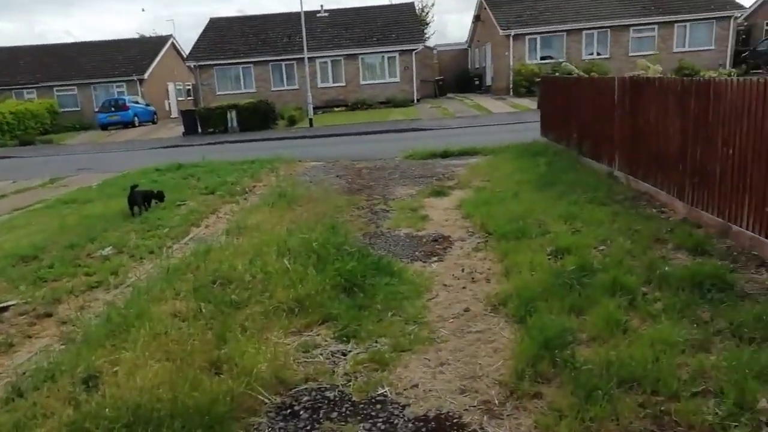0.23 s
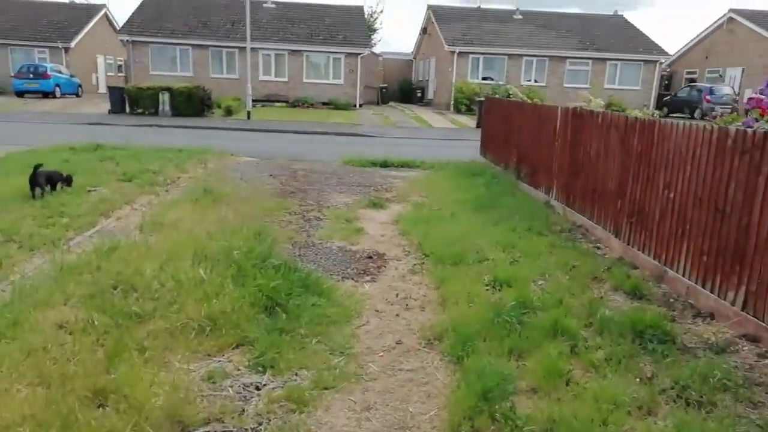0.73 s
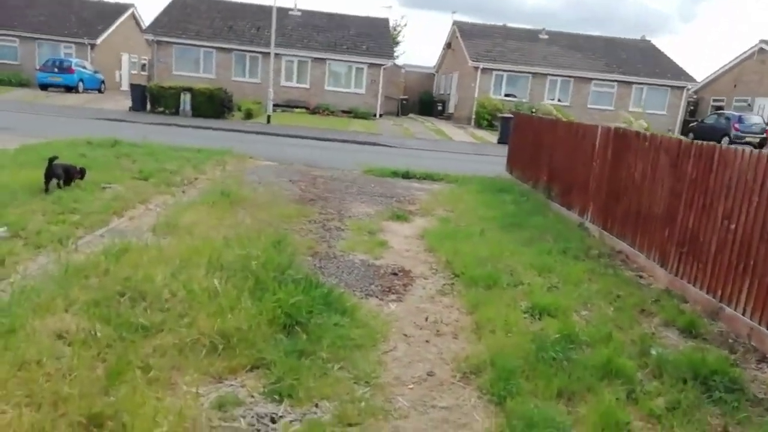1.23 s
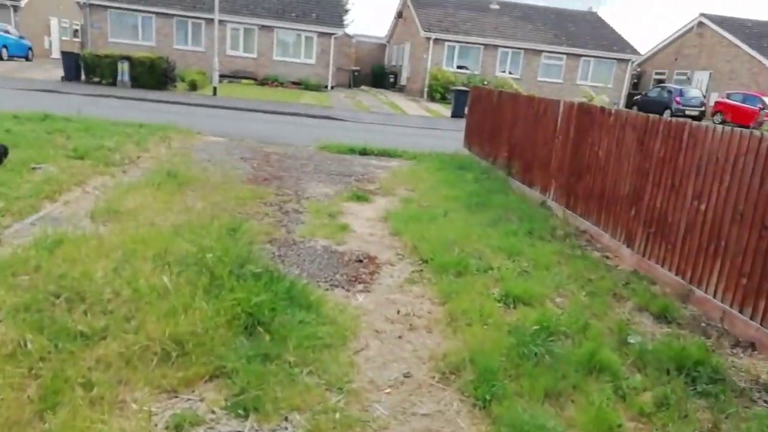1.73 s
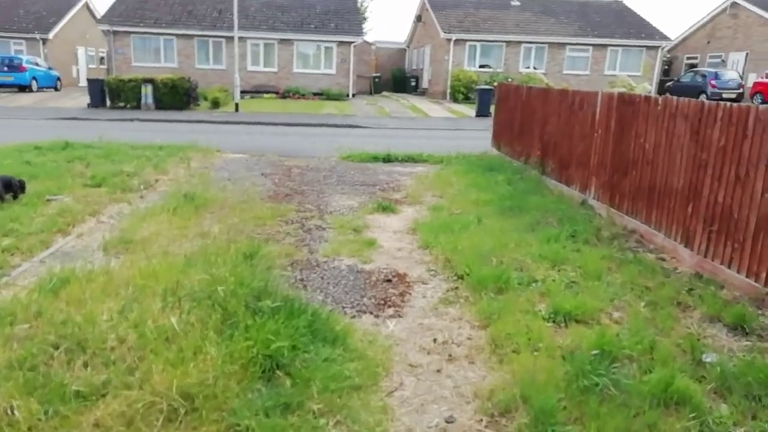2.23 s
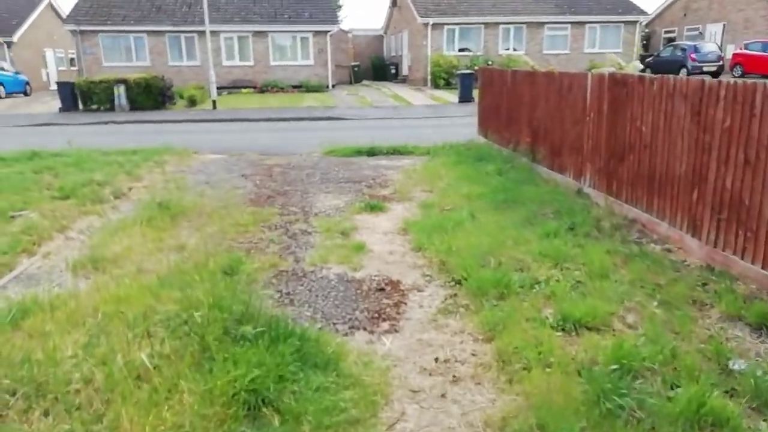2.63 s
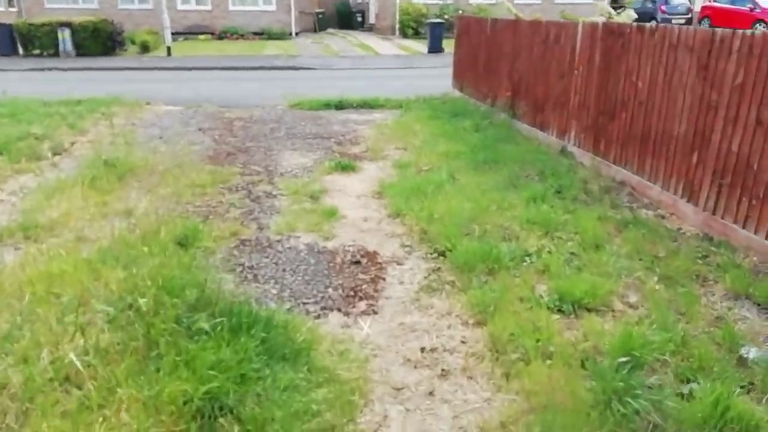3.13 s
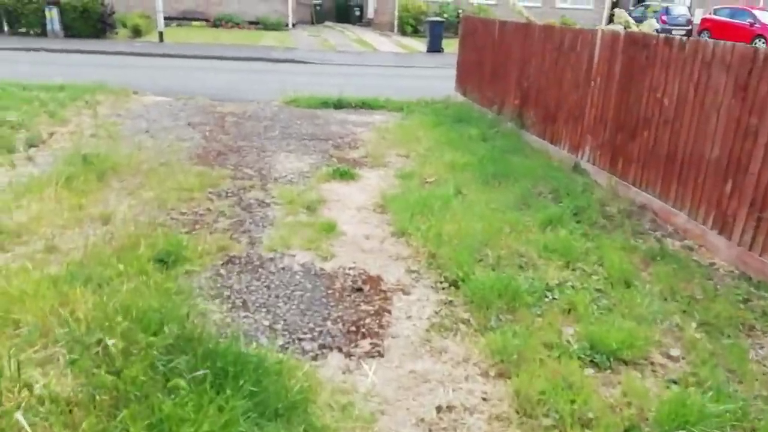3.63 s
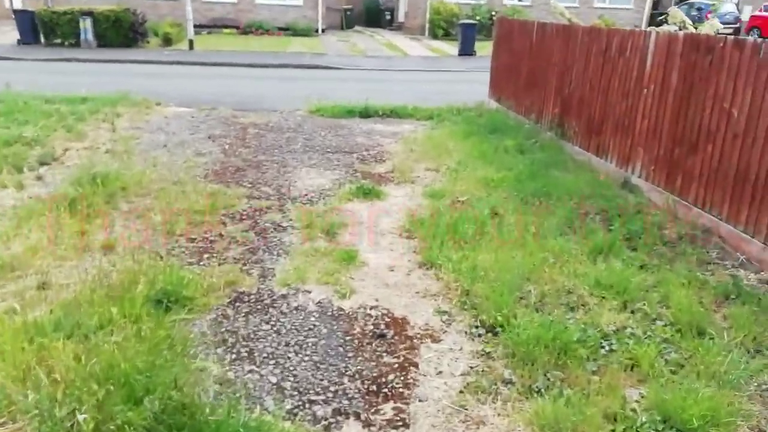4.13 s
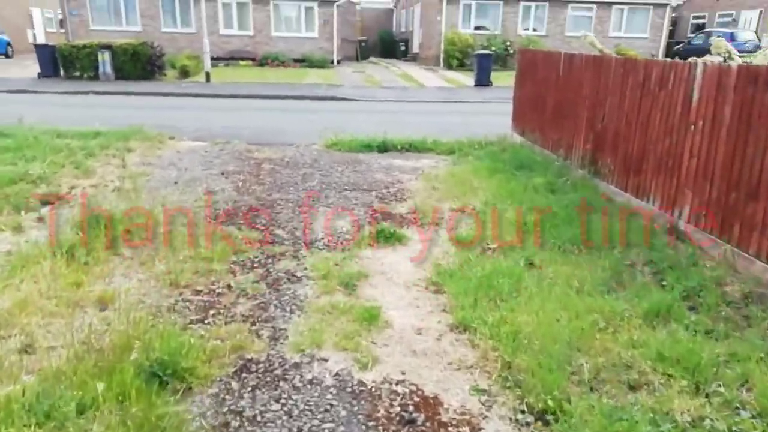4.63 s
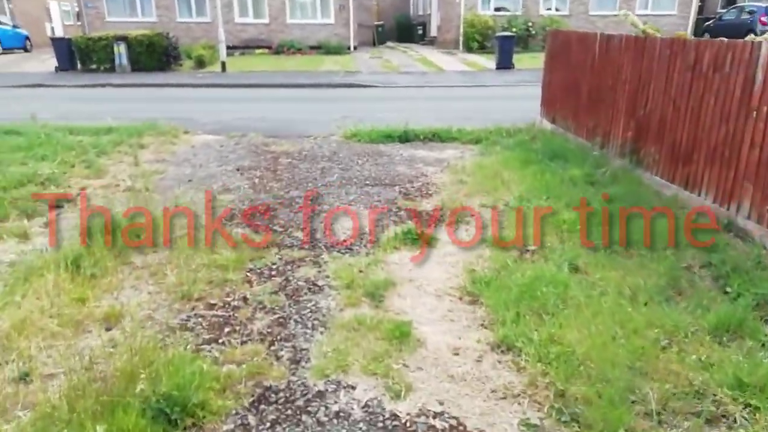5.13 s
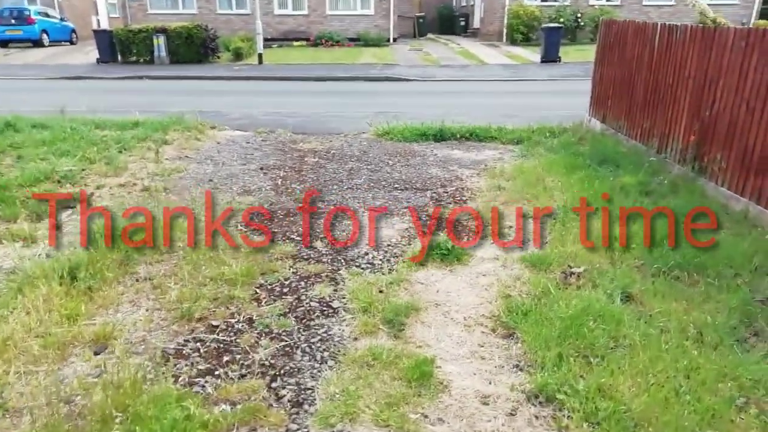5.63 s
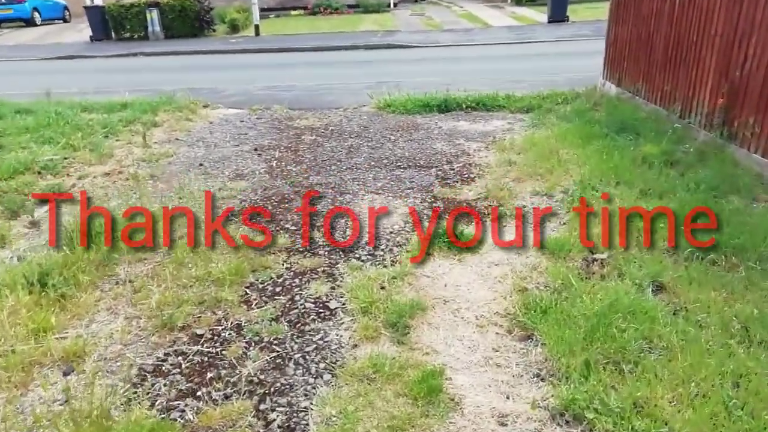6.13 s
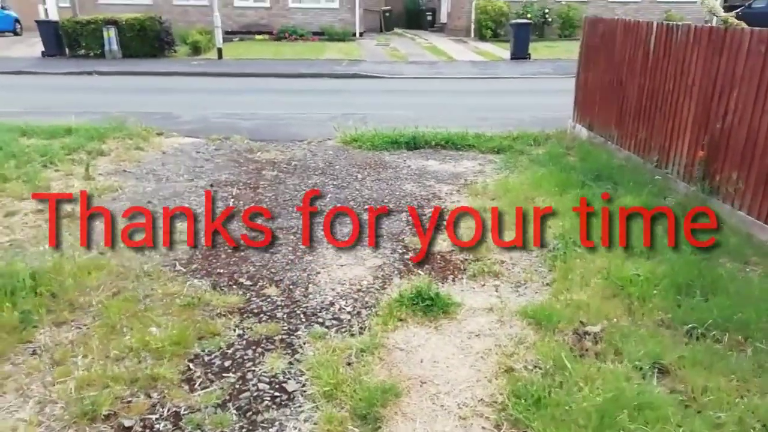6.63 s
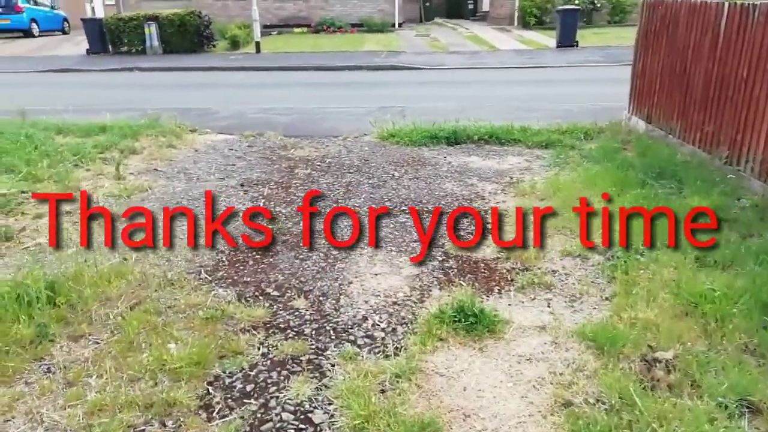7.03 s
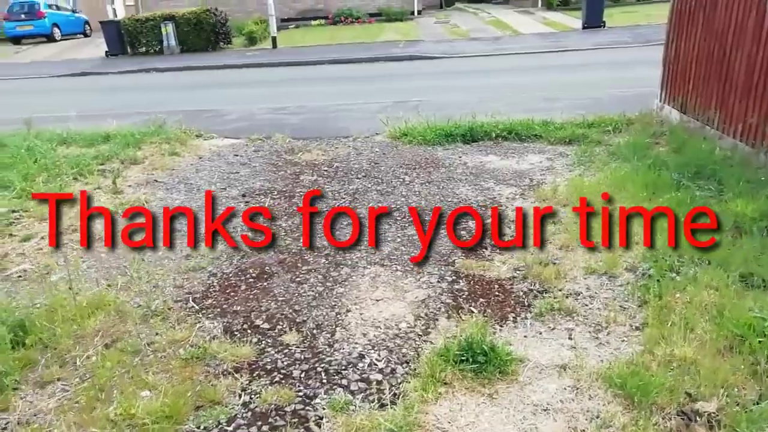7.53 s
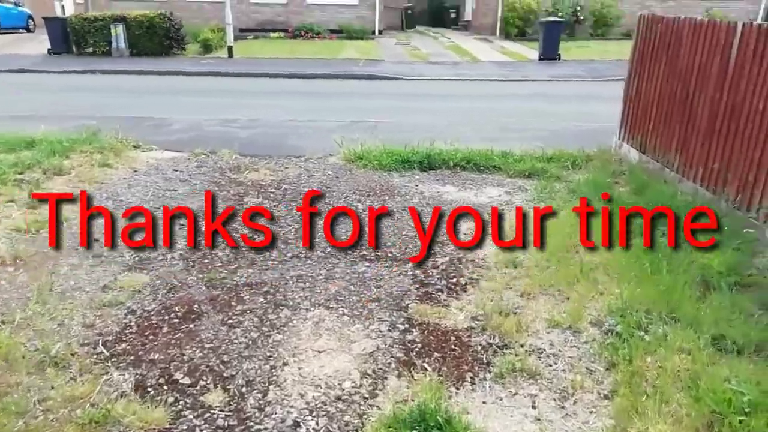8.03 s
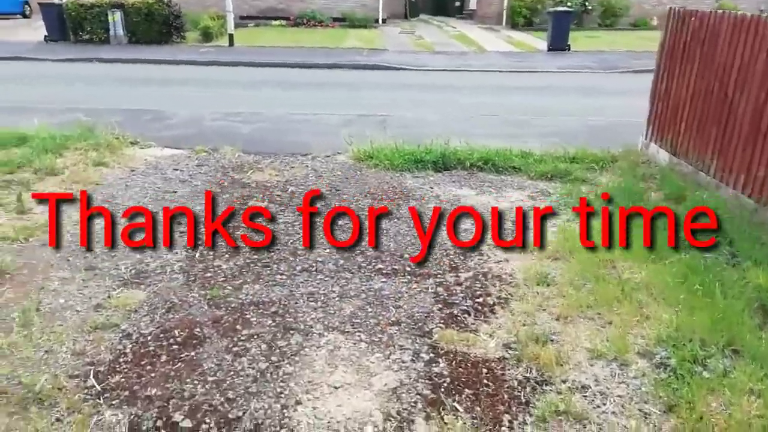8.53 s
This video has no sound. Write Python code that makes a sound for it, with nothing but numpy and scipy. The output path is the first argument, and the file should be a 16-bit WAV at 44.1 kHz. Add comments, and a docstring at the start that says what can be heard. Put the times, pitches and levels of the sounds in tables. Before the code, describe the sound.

Outdoors among houses, close wind noise on a carried phone dominates. From 0 to 1 s, uneven low puffs and slaps come with faint high bird chirps at about 0.4 to 1 s. A harder burst hits at 1.1 to 1.3 s, then a brief easing around 1.4 s. From 2.3 s the rumble builds, thick and fluttering, mainly on the right, with violent slaps around 3 to 3.3 s and 4 to 5.2 s; grass swishes and snaps are partly buried. At about 5.4 s the wind collapses. A crisp snap at 5.5 s and a dense gravel crunch at 5.9 to 6.4 s stand out nearby. Lighter steps follow at 7.0 to 7.2 s, a low stone knock at 7.8 s, and grit at 8.1 and 8.5 s. Distant birds twitter from 6.9 to 8.3 s over soft steady hiss, with deep soft wind thumps at 7.8 to 8.3 s.

```python
"""Gusty wind drums on the two microphone ports of a phone carried along a grass and gravel path.
Buffeting is frozen turbulence read at the wind's speed; single vortices add slaps, and each port
leaks late and dull into the other channel. Shoes swish, crunch, snap and knock as filtered noise grains
and decaying tones, the noise lifted near 9 kHz by the port cavity. Far birds chirp as warbling
glides with echoes, over a steady coloured hiss of leaves and streets."""
import sys
import numpy as np
from scipy import signal
from scipy.fft import rfft, irfft
from scipy.io import wavfile
from scipy.ndimage import uniform_filter1d, map_coordinates

SR = 44100
rng = np.random.default_rng(int(sys.argv[2]) if len(sys.argv) > 2 else 0)


def unload_audio(sound):
    """Save the sound as a 16-bit wav file, at the path given as the first command line argument."""
    columns = np.transpose(np.atleast_2d(sound))
    # keep every value between -1 and 1, then stretch to whole-number steps
    steps = np.round(np.clip(columns, -1, 1) * 32767)
    wavfile.write(sys.argv[1], SR, steps.astype(np.int16))


N = 387198
T = np.arange(N) / SR  # seconds

# sharpness at which the eddies pass at unit speed, and the rise in sharpness that doubles the speed
SHARP_REF_DB, SHARP_DB_PER_OCTAVE = -14, 20


def undb(db):
    """Level to amplitude: 20 dB is a factor of ten."""
    return 10 ** (np.asarray(db) / 20)


def unit(x):
    """Normalize the power: scale to rms 1."""
    return x / np.sqrt(np.mean(x ** 2))


def coloured(points, size):
    """Spectral shaping: white noise weighted by (Hz, dB) points, silent outside them, rms 1."""
    hz, db = np.transpose(points)
    f = np.fft.rfftfreq(size, 1 / SR) + 1e-3  # avoids log of zero
    gain = undb(np.interp(np.log(f), np.log(hz), db, left=-200, right=-200))
    spectrum = rfft(rng.standard_normal(size))
    return unit(irfft(spectrum * gain, size))


def band(x, hz, width_hz):
    """Simple resonance: a second-order peak with gain 1 at the centre."""
    return signal.lfilter(*signal.iirpeak(hz, hz / width_hz, SR), x)


def walk(per_s):
    """Band-limited fluctuation: random levels held 1 / per_s seconds and smoothed twice, rms 1."""
    hold = int(SR / per_s)
    steps = np.repeat(rng.standard_normal(N // hold + 1), hold)
    smooth = uniform_filter1d(uniform_filter1d(steps, hold), hold)
    return unit(smooth[:N])


def add(track, s, sound):
    """Superposition: mix a short sound into the track from time s."""
    i = int(s * SR)
    track[..., max(i, 0):i + sound.shape[-1]] += sound[..., max(-i, 0):N - i]


def speed_of(sharp_db):
    """Doppler-like scaling: the faster eddies are carried past, the higher they sound."""
    return 2 ** ((sharp_db - SHARP_REF_DB) / SHARP_DB_PER_OCTAVE)


def air():
    """Diffuse field: partly correlated steady hiss of far leaves and streets, swelling a little."""
    # Spectrum of the hiss. Each row: frequency in Hz, relative level in dB per Hz.
    spectrum = [(290, -16), (500, 0.5), (648, -2.5), (1170, 1), (1720, -1), (2500, -5.5), (4020, -4.5),
                (6090, -7), (7450, -8), (8720, -3), (10200, -13.5), (14600, -17), (15500, -36)]
    level_db = -64
    both, left, right = (coloured(spectrum, size=2 ** 19)[:N] for _ in range(3))
    swell_db = 0.53 * walk(2.0) + 0.33 * walk(9)
    return undb(level_db + swell_db) * unit(np.array([left, right]) + 0.26 * both)


def birds(warble_hz=327, rough=.5, wander=.8, ramp_s=.015, echo_s=0.06, echo_db=-4.5):
    """Frequency modulation: gliding notes with a fast uneven warble, trailed by echoes off the houses."""
    # Notes of far birds. Each row: start in seconds, length in seconds, start pitch in Hz, end pitch in Hz,
    # warble depth in Hz, level in dB before the throb.
    notes = [(0.393, 0.1, 4430, 4270, 91, -49), (.398, 0.052, 4630, 4420, 101, -56.5),
             (0.428, 0.12, 3520, 3100, 140, -64), (0.483, 0.12, 4330, 3710, 150, -67),
             (.57, .07, 3160, 3200, 59.5, -72.5), (0.672, 0.086, 4430, 4300, 129, -64),
             (0.85, 0.11, 4320, 4120, 109, -57), (0.924, 0.11, 5270, 5200, 220, -63),
             (0.88, .25, 4780, 4730, 111, -65), (0.908, 0.088, 3290, 3540, 120, -66),
             (1.003, 0.047, 4260, 4070, 119, -66.5), (2.066, 0.02, 4120, 3870, 150, -66.5),
             (2.698, .055, 1870, 1850, 60, -77), (2.921, 0.066, 4130, 3820, 302, -58),
             (3.548, 0.32, 4360, 4540, 444, -65), (3.948, 0.12, 5280, 4880, 333, -67.5),
             (4.11, 0.08, 4140, 3280, 67.4, -72), (4.14, 0.038, 3300, 3520, 110, -60),
             (4.411, 0.095, 4360, 4060, 485, -66), (6.638, 0.29, 2520, 2084, 40, -76.5),
             (6.921, 0.15, 2360, 2740, 25.3, -68.5), (6.933, 0.05, 4200, 3940, 200, -67),
             (7.032, 0.039, 4020, 4170, 200, -66), (7.069, 0.05, 4100, 4210, 130, -52.5),
             (7.224, 0.078, 4740, 4900, 173, -66.5), (7.318, 0.06, 5620, 5270, 199, -67),
             (7.407, 0.15, 5270, 5360, 203, -67), (7.378, 0.12, 5050, 4470, 148.6, -65.5),
             (7.44, 0.031, 3990, 3990, 100, -66.5), (7.515, 0.046, 3950, 3850, 60, -62.5),
             (7.595, 0.031, 3480, 3380, 234, -59), (7.664, 0.04, 3500, 3650, 319, -51.5),
             (7.753, 0.044, 3390, 3460, 171, -56.5), (7.817, 0.052, 3810, 3580, 200, -64),
             (8.062, 0.074, 4100, 3780, 100, -59), (8.048, .025, 4880, 4750, 150, -63),
             (8.139, 0.068, 2640, 2410, 60, -63.5), (8.218, 0.185, 2390, 2370, 60, -69.5)]
    out = np.zeros(N)
    warble = np.sin(2 * np.pi * np.cumsum(warble_hz * (1 + rough * walk(120))) / SR)
    throb_db = 5.5 * walk(90)
    warble += wander * walk(400)
    for s, length, start_hz, end_hz, depth_hz, db in notes:
        span = slice(int(s * SR), int((s + length) * SR))
        bend = 1.5 if end_hz > start_hz else .7  # rises start slowly, falls start fast
        glide = np.linspace(0, 1, span.stop - span.start) ** bend
        hz = start_hz + (end_hz - start_hz) * glide + depth_hz * warble[span]
        tone = np.sin(2 * np.pi * np.cumsum(hz) / SR)
        envelope = signal.windows.tukey(len(hz), min(ramp_s * 2 / length, 1))
        add(out, s, undb(db + throb_db[span]) * envelope * tone)
    t = T[:SR // 4]
    houses = rng.standard_normal((2, len(t))) * np.exp(-t / echo_s)
    echoes = signal.fftconvolve(out[None], houses, axes=1)[:, :N]
    direct = np.array([np.roll(out, 5), out])  # 5 samples later on the left: a little off to the right
    return direct + undb(echo_db) * echoes * np.std(out) / np.std(echoes)


def port(x, skirt=0.088):
    """Cavity resonance: the port's peak near 9 kHz over a weaker broad response."""
    peak_hz, width_hz = 8710, 1100
    peak = band(band(x, peak_hz, width_hz), peak_hz, 2.0 * width_hz)
    return peak + skirt * band(band(x, 9300, 6500), 9600, 9900)


def crackle(per_s, scatter_db, tail_s=0.0048, hiss=1.0):
    """Shot noise: unrelated left and right grains of uneven size over a hiss, rms 1."""
    hit = rng.random((2, N)) < per_s / SR
    size = hit * undb(scatter_db * np.minimum(rng.exponential(size=(2, N)), 4))
    grains = signal.lfilter([1], [1, -np.exp(-1 / (tail_s * SR))], size)
    return unit((unit(grains) + hiss) * rng.standard_normal((2, N)))


def swishes():
    """Frictional noise: grass brushes the shoes in dense grains, brightened by the port cavity."""
    # Shoes in the grass. Each row: time in seconds, level in dB before the flutter.
    levels = [(0.0, -62), (0.05, -56), (0.24, -64), (0.8, -63.5), (0.85, -67.5), (1.15, -63), (2.05, -72),
              (2.17, -58), (2.2, -57.5), (2.47, -78), (2.69, -77), (2.74, -61), (2.86, -73.5), (2.96, -61),
              (3.4, -73.5), (3.47, -56.5), (3.49, -68), (3.89, -62.5), (3.91, -53.5), (4.04, -68.5),
              (4.28, -69.5), (4.35, -45.5), (4.38, -58), (4.52, -63), (4.79, -58), (4.94, -70.5),
              (5.09, -60), (5.23, -63), (5.28, -48.5), (5.38, -68.5), (5.48, -56), (5.82, -70),
              (6.02, -50.5), (6.04, -66), (6.18, -60), (6.23, -61), (6.31, -65.5), (6.41, -57.5),
              (6.65, -68), (7.24, -62), (8.26, -63.5), (8.63, -67), (8.66, -57), (8.78, -63)]
    grass = unit(port(crackle(250, 1.8)))
    return grass * undb(np.interp(T, *np.transpose(levels)) + 2.1 * walk(40))


def add_scuffs(out, attack=0.19, fade_db=-8):
    """Granular friction: soles grind on grit, giving uneven grains in a broad resonance."""
    # Soles on grit. Each row: start in seconds, length in seconds, level in dB before shape and filters,
    # centre in Hz.
    scuffs = [(0.032, 0.075, -58.5, 2510), (1.13, 0.096, -61, 1800), (2.071, 0.089, -52, 1660),
              (3.885, 0.085, -61, 2500), (3.967, 0.066, -61, 1800), (4.306, 0.11, -61.5, 3500),
              (5.262, 0.087, -62, 4000), (5.881, 0.0085, -46.5, 2000), (5.89, 0.036, -59, 4000),
              (5.97, 0.041, -51, 3480), (5.987, 0.053, -46, 2300), (6.032, 0.1, -58.5, 4000),
              (6.091, 0.018, -48.5, 3870), (6.095, 0.093, -55, 1500), (6.11, 0.028, -63, 4000),
              (6.304, 0.19, -60.5, 1430), (7.019, 0.027, -54, 2400), (7.233, 0.11, -60, 2000),
              (8.118, 0.061, -56.5, 2600), (8.493, 0.053, -52.5, 2470)]
    grit = crackle(1000, 5, tail_s=.0008, hiss=.3)
    for s, length, db, hz in scuffs:
        grains = grit[:, int(s * SR):int((s + length) * SR)]
        grains = 0.39 * grains[0] + grains  # partly alike in both channels
        u = np.linspace(0, 1, grains.shape[1])
        ramps = np.clip(np.minimum(u / attack, 4 * (1 - u)), 0, 1)  # attack is a share of the length
        shape = ramps * undb(fade_db * (u - .4))
        crunch = band(band(grains, hz, 2.7 * hz), hz, 2.9 * hz)
        add(out, s, undb(db) * shape * (crunch + 0.19 * port(grains, skirt=0.093)))


def add_snaps(out, bright_t60_s=0.013, dull_t60_s=0.1, crack_db=-6.5, crack_t60_s=0.003):
    """Impulsive fracture: stalks and stones snap in decaying noise, bright, cracking and dull at once."""
    # Stalks and stones. Each row: start in seconds, level in dB before the filters,
    # dull part over bright part in dB before their fixed gains.
    snaps = [(0.1404, -49, -24), (0.464, -51.5, 7.5), (0.701, -44, -1.5), (0.778, -37.5, -18),
             (1.1475, -45, -9), (1.625, -53, 3), (1.78, -57, 6), (2.0822, -54.5, 6), (2.094, -43, -10),
             (2.118, -47, -20), (2.1677, -34.5, -15), (2.265, -50.5, 11.5), (2.397, -56, 3),
             (2.74, -40.5, -17), (2.764, -54, 15), (3.199, -46.5, -12), (3.4442, -42, -26),
             (3.7674, -51, 2.5), (3.902, -39, -10), (3.9886, -40, -2.5), (4.3108, -38.5, -3),
             (4.322, -54.5, -10), (4.342, -33.5, -30), (4.411, -39, -16), (5.0475, -47, -26),
             (5.2584, -43, -32), (5.481, -32.5, -35), (5.8827, -37.5, -11), (5.959, -40, -20),
             (6.092, -47, 5), (6.2073, -41, -16), (6.2235, -39, -23), (6.2409, -31, -22),
             (6.273, -46, -26.5), (6.305, -48, -25), (6.4333, -46, -5), (6.593, -43, -18), (7.023, -48, -8),
             (8.136, -57, -7), (8.492, -47, -0.5)]
    ring_hz, ring_width_hz = 1760, 240  # the dull ring of a stone
    t = T[:SR // 10]
    for s, db, dull_db in snaps:
        burst = rng.standard_normal((3, len(t)))
        bright = 1.7 * port(burst[:2] * undb(-60 * t / bright_t60_s), skirt=0.24)
        thud = band(burst[2] * undb(-60 * t / dull_t60_s), ring_hz, 2 * ring_width_hz)
        dull = 2.2 * undb(dull_db) * band(thud, ring_hz, ring_width_hz)
        crack = band(burst[2] * undb(crack_db - 60 * t / crack_t60_s), 5400, 7000)
        add(out, s, undb(db) * (bright + crack + dull))


def add_knocks(out, t60_s=0.032):
    """Damped free vibration: stones knock underfoot, each ringing at its own pitch."""
    # Knocking stones. Each row: start in seconds, level in dB before onset and decay, ring in Hz.
    knocks = [(3.9, -43, 990), (5.883, -55, 4300), (5.96, -47, 1630), (6.094, -41, 2550),
              (7.022, -48, 2360), (7.808, -37.5, 754), (8.134, -45, 2600)]
    t = T[:SR // 10]
    onset = 1 - np.exp(-t / 0.001)
    for s, db, hz in knocks:
        add(out, s, undb(db - 60 * t / t60_s) * np.sin(2 * np.pi * hz * t) * onset)


def shoes(port_top_hz=11900):
    """Low-pass reception: footfall sounds summed, of which the ports hear little above the cavity peak."""
    out = swishes()
    add_scuffs(out)
    add_snaps(out)
    add_knocks(out)
    return signal.sosfilt(signal.butter(2, port_top_hz, fs=SR, output="sos"), out)


# The harder the wind blows, the more lesser slaps and fizz: the wind level taken as full
FULL_RATE_DB = -20


def buffeting(db, sharp_db, surge=.4, surge_db=4, flutter_db=3):
    """Frozen turbulence: eddies read at the wind's speed, so a surge is at once louder and higher."""
    # Pressure of eddies carried past at unit speed. Each row: frequency in Hz, relative level in dB per Hz.
    spectrum = [(15, -8), (35, -6.5), (70, -1), (120, -4.5), (200, -8), (330, -22), (550, -41),
                (900, -68.5), (1600, -68), (2600, -94)]
    gust = 1.8 * np.tanh(walk(110) / 1.8)  # the strongest surges are rounded off
    speed = np.clip(speed_of(sharp_db) * 2 ** (surge * gust), .2, 4)
    place = np.cumsum(speed)
    eddies = map_coordinates(coloured(spectrum, size=2 ** 21), [place], order=1, mode="wrap")
    # fine fizz that strengthens with level, sharpness and surge
    fizz = unit(band(band(rng.standard_normal(N), 620, 700), 600, 1100))
    fizz_db = -39.5 + 0.77 * (db - FULL_RATE_DB) + 2.6 * gust
    fizz_db += 1.8 * (np.minimum(sharp_db, -11) - SHARP_REF_DB)
    eddies += undb(fizz_db) * fizz
    return unit(eddies * undb(surge_db * gust + flutter_db * np.tanh(walk(18))))


def slap(width_ms, chance, core=0.7, core_db=-15, wake_ms=6, spin=0.45):
    """Vortex pressure pulse: a push and pull centred 30 ms in, with small cores shed around it."""
    t = 1000 * T[:int(.06 * SR)] - 30  # ms
    # random phases; the first draw sets the polarity
    turn = np.exp(1j * np.pi * (np.round(chance[0]) + 0.21 + 0.77 * chance[1:]))
    shed_ms = wake_ms * (chance[2:] - .3) * np.arange(len(chance) - 2)
    cores = turn[1:, None] / (1 - 1j * (t - shed_ms[:, None]) / (core * width_ms)) ** 2
    vortex = turn[0] * np.exp(1j * spin * t / width_ms) / (1 - 1j * t / width_ms) ** 2
    swing = vortex + undb(core_db) * cores.sum(axis=0)
    return np.real(swing) * np.hanning(len(t))


def lesser_slaps(db, sharp_db, share):
    """Random arrivals: chance slaps follow the wind's level, denser in strong and narrower in sharp wind."""
    full_per_s, db_per_halving = 70, 5  # they thin out as the wind drops
    over_wind_db, scatter_db, least_width_ms = 0.5, 1, 1.12  # width at unit speed
    when, side, spread, luck, girth = rng.random((int(full_per_s * N / SR), 5)).T
    i = (when * N).astype(int)
    peak_db = db[i] + over_wind_db + scatter_db * (2 * spread - 1)
    width_ms = least_width_ms / speed_of(sharp_db[i]) * 2 ** girth
    rows = np.transpose([T[i], peak_db, width_ms, side > share[i]])
    return list(rows[luck < 2 ** ((db[i] - FULL_RATE_DB) / db_per_halving)])


def leak(ports, leak_s=0.00049, leak_hz=266):
    """Acoustic crosstalk: each port reaches the other channel delayed and low-passed."""
    pole = np.exp(-2 * np.pi * leak_hz / SR)
    late = [np.interp(T - leak_s, T, p) for p in ports[::-1]]
    return signal.lfilter([1 - pole], [1, -pole], late)


def wind(buffet_db=1.24, eddy_top_hz=1640):
    """Turbulent pressure at a port: buffeting and slaps, smoothed by the mesh and leaking across."""
    # Wind at the ports. Each row: time in seconds, level in dB before the buffeting gain,
    # sharpness in dB (upper rumble over lower).
    gusts = [(0.0, -25, -12), (0.12, -35, -20), (0.19, -31, -10), (0.24, -33.5, -28), (0.32, -26, -14),
             (0.54, -39, -15), (0.56, -31.5, -25), (0.66, -35.5, -13), (0.78, -26.5, -23), (0.8, -38, -19),
             (0.879, -24.5, -9), (0.95, -38, -24), (1.1, -31.5, -13), (1.15, -21.5, -8), (1.2, -30, -13),
             (1.239, -18, -9), (1.3, -26.5, -10), (1.421, -45, -28), (1.78, -25, -13), (1.91, -34, -18),
             (1.96, -27, -21), (2.22, -28, -15), (2.33, -33, -16), (2.39, -22, -12), (2.5, -26, -14),
             (2.58, -23, -13), (2.7, -20.5, -10), (2.83, -21.5, -13), (2.93, -23, -16), (2.98, -16.5, -11),
             (3.45, -21, -13), (3.57, -20.5, -17), (3.64, -27.5, -7), (3.69, -33, -19), (4.059, -20, -13),
             (4.18, -28, -19), (4.2, -24, -12), (4.33, -17, -16), (4.35, -18, -6), (4.47, -25.5, -24),
             (4.62, -23, -9), (4.77, -21.5, -11), (4.84, -35.5, -24), (5.13, -21.5, -13),
             (5.36, -20.5, -15), (5.45, -43, -30), (5.6, -51, -29), (5.92, -30, -32), (5.968, -33, -17),
             (6.04, -40.5, -33), (6.109, -31, -26.5), (6.279, -44, -30), (6.309, -32.5, -26),
             (6.38, -52.5, -23), (6.6, -33.5, -28), (6.63, -44, -30), (6.7, -37.5, -30),
             (7.209, -31.5, -30), (7.458, -54.5, -21), (7.798, -24.5, -29), (7.92, -36, -25),
             (8.121, -23.5, -31), (8.29, -24.5, -14.5), (8.438, -39, -33), (8.58, -54, -22.5),
             (8.658, -33.5, -29.5), (8.78, -37, -16.5)]
    # Share of the wind's power that meets the left port. Each row: time in seconds, share from 0 to 1.
    left_share = [(0, 0.34), (1, 0.14), (2.2, 0.51), (3.3, 0.21), (3.7, 0.63), (4.1, 0.05), (5.4, 0.03),
                  (5.8, 0.29), (7.3, 0.06), (8.78, 0.03)]
    # Single eddies that slap a port. Each row: centre in seconds, level in dB before the mesh,
    # width in ms, port (0 left, 1 right).
    single_slaps = [(0.0283, -13.5, 1.7, 0), (0.1857, -12.5, 1.83, 1), (0.266, -14.5, 3.5, 1),
                    (0.318, -24, 1.24, 1), (0.3468, -16, 1.4, 1), (0.5704, -19.5, 3, 0),
                    (0.7698, -14, 2.1, 0), (0.8634, -8.5, 1.63, 1), (0.8863, -9, 1.9, 1),
                    (1.1337, -12, 1.47, 0), (1.1521, -10, 1.66, 1), (1.1753, -10, 1.33, 1),
                    (1.231, -12, 1.6, 1), (1.2381, -11, 1.38, 1), (1.258, -14, 1.3, 1),
                    (1.2696, -10.5, 1.4, 1), (1.312, -16, 1.7, 1), (1.6107, -17.5, 1.8, 0),
                    (1.7189, -16.5, 3.3, 0), (1.9685, -18.5, 3.55, 1), (2.125, -17, 1.63, 1),
                    (2.142, -15, 1.8, 1), (2.2394, -23, 0.91, 0), (2.389, -10.5, 1.43, 1),
                    (2.412, -11, 1.8, 1), (2.5584, -10.5, 2.7, 0), (2.5818, -12.5, 1.5, 1),
                    (2.6824, -12, 0.72, 1), (2.688, -13.5, 1.2, 1), (2.7574, -10, 1.5, 1),
                    (2.789, -10, 1.03, 1), (2.767, -23, 0.28, 1), (2.8456, -7.5, 1.38, 0),
                    (2.977, -5, 1.5, 1), (2.982, -5.5, 0.62, 1), (3.0007, -3, 0.71, 1),
                    (3.0129, -8.5, 1.4, 1), (3.04, -8, 0.61, 1), (3.0519, -9, 0.97, 1),
                    (3.094, -14.5, 0.69, 1), (3.1273, -5, 1.3, 1), (3.1427, -4.5, 1.5, 1),
                    (3.156, -4, 0.51, 1), (3.1665, -4, 1.05, 1), (3.2205, -7, 0.97, 1),
                    (3.293, -11, 0.94, 1), (3.3127, -7.5, 0.89, 1), (3.3385, -8.5, 0.99, 1),
                    (3.4303, -12.5, 0.78, 1), (3.5084, -12.5, 1, 1), (3.519, -13.5, 0.65, 1),
                    (3.5642, -11.5, 1.3, 1), (3.8197, -13.5, 1.46, 0), (4.033, -5.5, 1.42, 1),
                    (4.2036, -3.5, 1.45, 1), (4.218, -12.5, 1.36, 1), (4.2721, -9.5, 0.83, 1),
                    (4.2836, -3, 1.8, 1), (4.323, -15, 0.72, 1), (4.3633, -2.5, 1.2, 1),
                    (4.5603, -8.5, 1.14, 1), (4.596, -12, 0.81, 1), (4.616, -17.5, 1.7, 1),
                    (4.6333, -4, 1.3, 1), (4.662, -2.5, 0.9, 1), (4.687, -1.5, 1.02, 1),
                    (4.718, -11, 1.4, 1), (4.7499, -10.5, 1.66, 1), (4.772, -13.5, 1.22, 1),
                    (5.033, -13, 1.9, 1), (5.099, -11.5, 1.4, 1), (5.1254, -9, 1.56, 1),
                    (5.156, -7.5, 1.08, 1), (5.1856, -4, 1.4, 1), (5.2045, -8.5, 1.09, 1),
                    (5.3291, -7.5, 1.22, 1), (5.374, -10.5, 1.9, 1), (5.966, -17, 1.66, 0),
                    (6.309, -19, 3.15, 1), (6.5886, -21, 3.14, 0), (7.0799, -15.5, 3, 1),
                    (7.1755, -19.5, 3, 1), (7.8158, -14.5, 4.8, 1), (8.0716, -16, 3.5, 1),
                    (8.2514, -8, 1.8, 1), (8.694, -17.5, 3.1, 1)]
    s, *columns = np.transpose(gusts)
    db, sharp_db = (np.interp(T, s, c) for c in columns)
    share = np.clip(np.interp(T, *np.transpose(left_share)), 0, 1)
    rumble = [buffeting(db, sharp_db), buffeting(db, sharp_db)]
    ports = undb(db + buffet_db) * np.sqrt([share, 1 - share]) * rumble
    slaps = [*single_slaps, *lesser_slaps(db, sharp_db, share)]
    chances = rng.random((len(slaps), 6))
    for (s, slap_db, width_ms, side), chance in zip(slaps, chances):
        add(ports[round(side)], s - .03, undb(slap_db) * slap(width_ms, chance))
    # the mesh smooths the finest eddies
    ports = signal.sosfilt(signal.butter(2, eddy_top_hz, fs=SR, output="sos"), ports)
    return ports + leak(ports)


def scene(airborne_pan_db=-2):
    """Superposition: wind over the airborne sounds, which the right port hears a little louder."""
    airborne = shoes() + birds() + air()
    return wind() + airborne * undb(np.array([[airborne_pan_db], [-airborne_pan_db]]) / 2)


def record(dry, bass_hz=28.3, top_hz=15300):
    """Band limiting and soft saturation: the phone thins deep bass, rounds loud peaks and cuts the top."""
    thinned = signal.lfilter(*signal.butter(1, bass_hz, "high", fs=SR), dry)
    rounded = np.tanh(thinned / 1.3) * 1.3
    return signal.sosfilt(signal.ellip(8, .2, 70, top_hz, fs=SR, output="sos"), rounded)


dry = scene()
out = record(dry)
unload_audio(out)
```